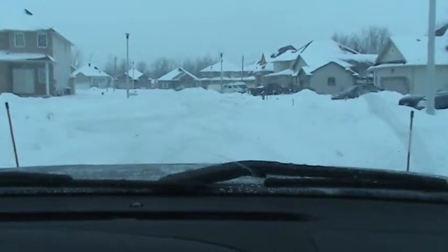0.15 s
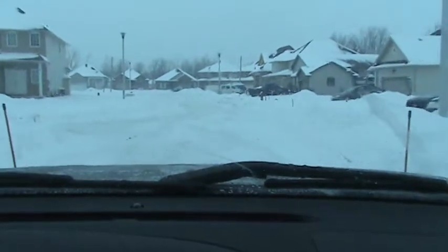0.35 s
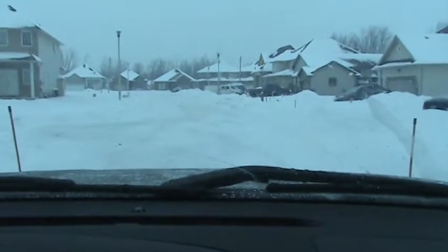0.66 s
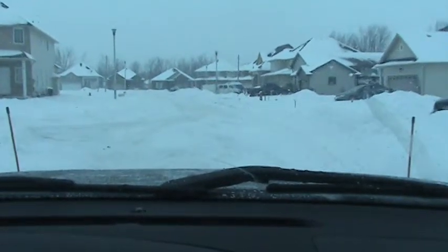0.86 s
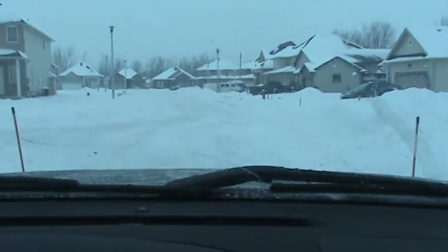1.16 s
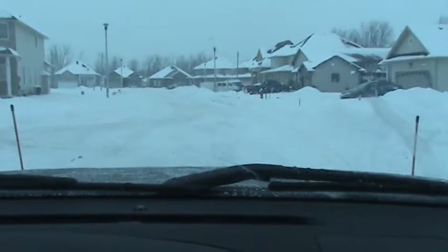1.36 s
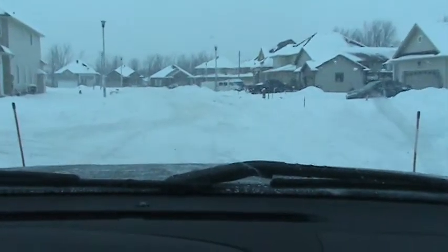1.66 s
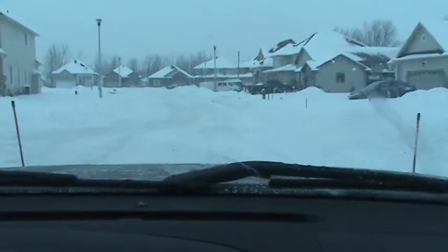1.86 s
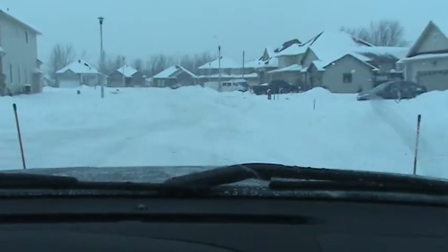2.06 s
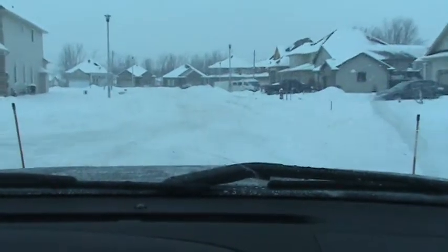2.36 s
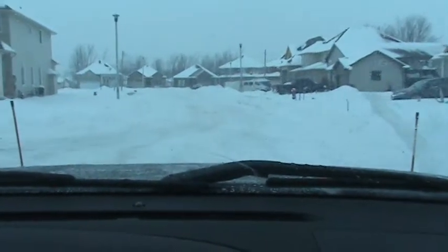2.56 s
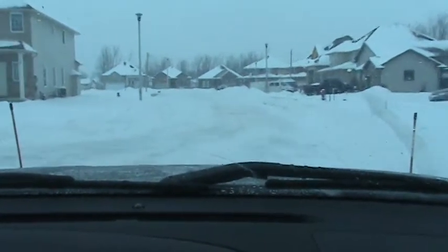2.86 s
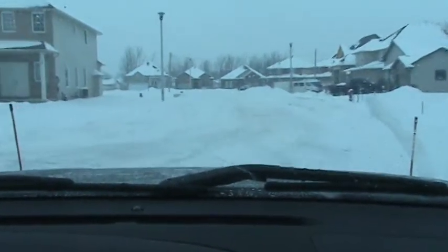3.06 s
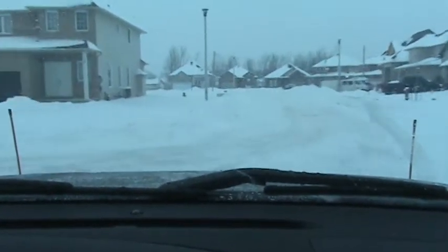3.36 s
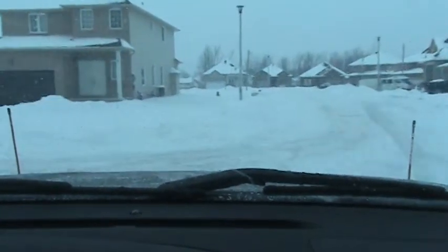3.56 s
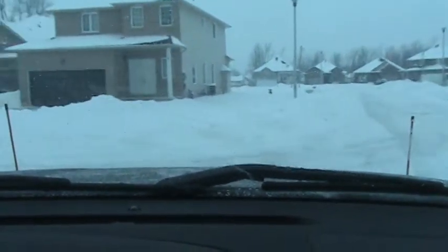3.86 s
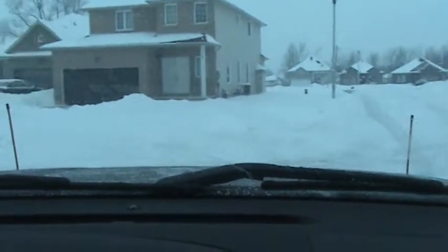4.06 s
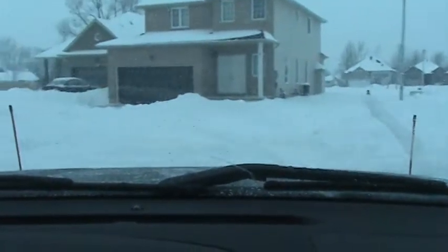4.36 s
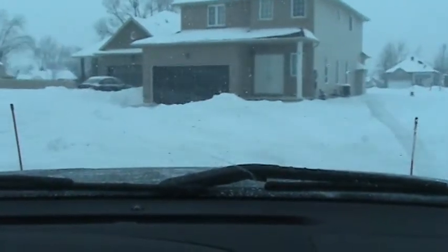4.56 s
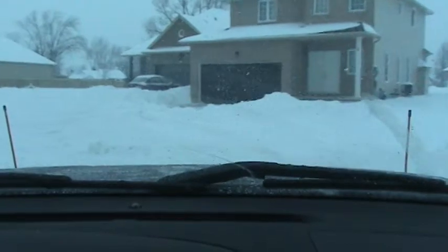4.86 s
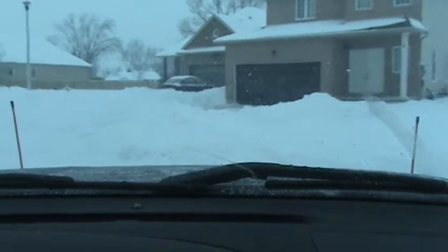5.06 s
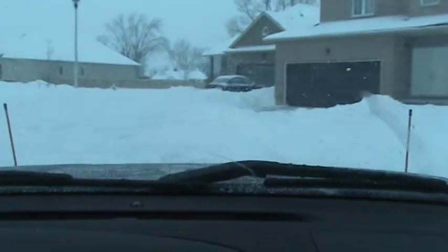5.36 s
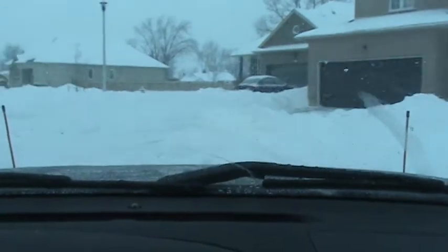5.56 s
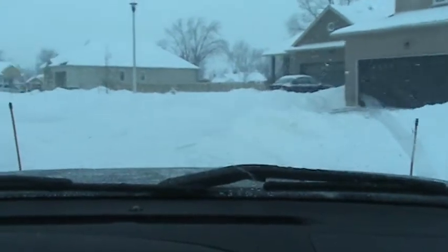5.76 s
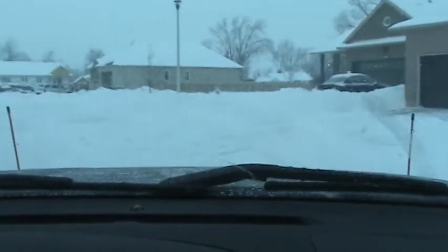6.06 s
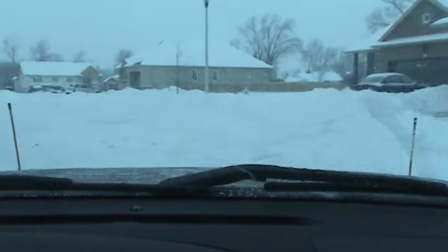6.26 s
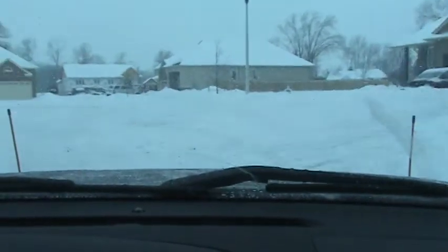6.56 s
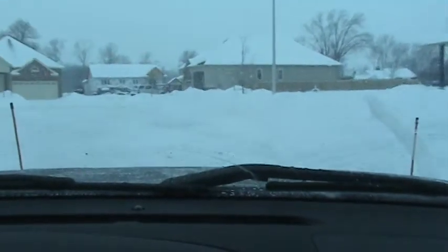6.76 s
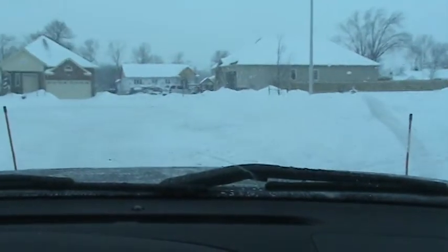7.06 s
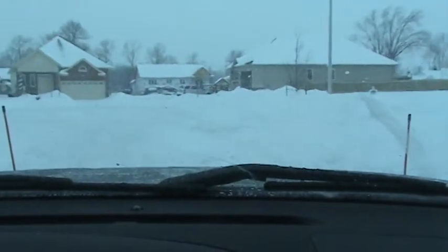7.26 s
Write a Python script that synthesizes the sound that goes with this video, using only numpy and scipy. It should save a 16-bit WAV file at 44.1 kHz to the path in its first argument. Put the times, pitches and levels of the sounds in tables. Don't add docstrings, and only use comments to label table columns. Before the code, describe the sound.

A small stereo camera inside a truck cab hears low body shudder and tyre rumble swelling and easing as the vehicle turns through packed snow. Over it runs a crisp, regular indicator tick-tock. Loose plastic taps and clicks irregularly, busiest in the first second and again after five. Around two to three seconds the cabin booms harder and gloves slip roughly around the wheel rim; afterwards jacket sleeves rustle softly, and dull thuds continue to the end.

```python
import sys
import numpy as np
from scipy import signal
from scipy.fft import rfft, irfft, next_fast_len
from scipy.io import wavfile
from scipy.ndimage import uniform_filter1d, map_coordinates

SR = 44100
rng = np.random.default_rng(int(sys.argv[2]) if len(sys.argv) > 2 else 0)


def makeup_ratio(level_db):
    decades = np.asarray(level_db, float) / 20
    return 10 ** decades


def dump(signal):
    limited = np.clip(np.atleast_2d(signal).T, -1, 1)
    pcm = np.round(limited * 32767).astype(np.int16)
    wavfile.write(sys.argv[1], SR, pcm)


N = 326340


def unit(x):
    return x / np.sqrt(np.mean(np.abs(x) ** 2) + 1e-20)


def along(points, hz):
    f, value = np.transpose(points)
    return np.interp(np.log(hz + 1), np.log(f + 1), value)


def over_time(points):
    s, value = np.transpose(points)
    return np.interp(np.arange(N) / SR, s, value)


def wobble(rate):
    knots = rng.standard_normal(int(N * rate / SR) + 4)
    return map_coordinates(knots, [np.arange(N) * rate / SR])


def filtered(x, response):
    m = next_fast_len(N + SR // 2)
    return irfft(rfft(x, m) * response(np.fft.rfftfreq(m, 1 / SR)), m)[..., :N]


def resonances(modes):
    def response(f):
        total = 0
        for k, (center, width, db) in enumerate(modes):
            damping = 1j * f * width
            total = total + (-1) ** k * makeup_ratio(db) * damping / (center * center - f * f + damping)
        return total
    return response


def rush(spectrum, patchy_db):
    z = signal.stft(rng.standard_normal((2, N)), nperseg=512)[2]
    patches = uniform_filter1d(rng.standard_normal(z.shape[1:]), 6, 0)
    patches = unit(uniform_filter1d(patches, 10, 1))
    pair = signal.istft(z * makeup_ratio(patchy_db * patches), nperseg=512)[1][:, :N]
    return unit(filtered(pair, lambda hz: makeup_ratio(along(spectrum, hz))))


def hum(hz, width, steady):
    drift = wobble(width) + 1j * wobble(width)
    drift = unit(drift / (np.abs(drift) + 0.053) ** np.clip(steady, 0, 1))
    wave = drift * np.exp(2j * np.pi * hz * np.arange(N) / SR) * np.sqrt(2)
    return np.array([wave.real, 0.36 * wave.imag])


def swells(s, db, rise, fall, hold, rest_db, bend):
    s, db, rise, fall, hold = (np.reshape(v, (-1, 1)) for v in (s, db, rise, fall, hold))
    t = np.arange(0, N + 16, 16) / SR
    before = np.maximum(s - t, 0) / np.abs(rise)
    after = np.maximum(t - s - hold, 0) / np.abs(fall)
    peaks = makeup_ratio(db - 10 * (before + after) ** bend)
    gain = np.sqrt((peaks ** 2).sum(axis=0) + makeup_ratio(rest_db) ** 2)
    return np.interp(np.arange(N) / SR, t, gain)


# start t/s, length t/s, level/dB
BODY_ROCKS = [(0.41, 0.54, -19), (1.32, 0.087, -18.5), (1.854, 0.23, -23), (2.43, 0.046, -25),
              (2.7, 0.29, -25), (3.46, 0.61, -28), (4.196, 0.38, -30), (4.81, 0.21, -23),
              (5.155, 0.93, -22.5), (6.34, 0.23, -19), (6.95, 0.23, -30)]
# t/s, level/dB
RUT_KICKS = [(.66, -19.5), (1.52, -21.5), (2.0, -16.5), (2.15, -15), (2.49, -21), (2.68, -16.5),
             (2.779, -11.5), (3.02, -24), (3.23, -32), (3.57, -17), (4.1, -19.5), (4.4, -25), (4.82, -17),
             (5.23, -20), (5.63, -21.5), (5.98, -26), (6.36, -16.5), (6.66, -15.5), (7.16, -25.5)]
# t/s, level/dB
SNOW_LOAD = [(0, -7), (.6, -5.5), (1.1, -6), (1.7, 0), (2.1, 1), (2.8, 3), (3.3, -4), (3.6, 3.5), (4.5, -3),
             (5.2, 2.5), (5.35, -1.5), (6.3, 3.5), (6.8, -3.5), (7.4, -5.5)]


def cab():
    s, length, db = np.transpose(BODY_ROCKS)
    rocking = swells(s, db, rise=0.093, fall=0.11, hold=length, rest_db=-52, bend=0.8)
    shudder = rocking * hum(25.5, width=7, steady=0.4)
    s, db = np.transpose(RUT_KICKS)
    kicks = swells(s, db - 3.5, rise=0.035, fall=0.046, hold=0, rest_db=-62, bend=1.4)
    boom = hum(104.5, width=15, steady=0.36) + makeup_ratio(-1) * hum(114.5, width=16, steady=0.65)
    return shudder + np.hypot(kicks, makeup_ratio(-28 + over_time(SNOW_LOAD))) * boom


# t/s, peak level/dB, middle f/Hz
SUSPENSION_THUDS = [
    (1.961, -23.5, 138),
    (2.683, -32, 159),
    (2.797, -25.5, 248),
    (4.378, -35, 213),
    (5.18, -29, 253),
    (4.941, -33, 262),
    (5.602, -27, 186),
    (5.76, -37, 262),
    (6.149, -34, 269),
    (6.37, -25.5, 140),
]
# f/Hz, level/dB per Hz
FLOOR_RUMBLE = [(4, -22), (14, -38), (38, 0.5), (50, -3), (62, 4.5), (85, -4), (130, -6.5), (150, -6.5),
                (190, -8), (225, -12.5), (262, -7), (310, -13.5), (400, -19), (700, -120)]
# f/Hz, level/dB per Hz
ENGINE_DRONE = [(200, -96), (330, -5.5), (430, 1.5), (650, -1.5), (900, -8.5), (1500, -14), (3000, -21.5),
                (6000, -35), (10000, -65), (13000, -42), (15800, -34)]


def tyres():
    load_db = over_time(SNOW_LOAD)
    rumble_db = -29 + 0.055 * load_db + 0.79 * wobble(6.3)
    sound = makeup_ratio(rumble_db) * rush(FLOOR_RUMBLE, patchy_db=1.18)
    t = np.arange(SR // 5) / SR
    for s, db, hz in SUSPENSION_THUDS:
        tones = sum(np.sin(2 * np.pi * hz * ratio * t) for ratio in (.75, 1, 1.3))
        thud = tones * makeup_ratio(db + 9.5 - 60 * t / 0.091) * (1 - np.exp(-t / 0.0037))
        sound[0, round(s * SR):][:len(t)] += thud
    drone_db = -43 + 0.065 * load_db + 0.54 * wobble(15)
    return sound + makeup_ratio(drone_db) * rush(ENGINE_DRONE, patchy_db=1.5)


# f/Hz, width/Hz, level/dB
DRIVE_WHINE = (11538, 22, -76)


def camera_drive():
    hz, width, db = DRIVE_WHINE
    return makeup_ratio(db) * hum(hz, width, steady=1)[0]


# t/s, peak level/dB, middle f/Hz, panel knock level/dB
PANEL_TAPS = [(0.227, -36, 940, -11), (.2473, -33, 842, 1), (.511, -35, 830, -17), (1.527, -31.5, 805, 1),
              (1.7619, -35, 825, 7.5), (2.1013, -32.5, 970, 6), (3.5034, -56, 860, 3),
              (3.827, -33.5, 1180, 2), (4.9565, -36, 842, -6), (5.1545, -30, 1000, 2),
              (5.3532, -31.5, 1040, -10), (5.391, -31, 960, 6), (5.4188, -34, 961, -11),
              (5.5107, -31.5, 961, 2), (5.6087, -35.5, 950, 8), (5.692, -36, 2500, 6),
              (5.841, -30, 2480, 4), (6.123, -31, 780, -10.5), (6.332, -31, 1480, -14)]
CLIP_TICKS = [(0.042, -27, 2400, -20), (.409, -33.5, 1310, -5), (0.482, -28.5, 1300, 2),
              (0.576, -22.5, 1350, -5), (0.6917, -24, 1290, -16), (.798, -27, 1390, -4),
              (.905, -25.5, 2460, -14), (1.2322, -34.5, 3450, 2), (1.4501, -29, 2400, -12),
              (1.5546, -32, 1430, 5), (2.868, -23, 1200, -8.5), (2.9792, -22.5, 1260, -4),
              (6.369, -32, 2080, 11), (6.3713, -26.5, 1380, 8.5), (6.378, -34.5, 1000, 12),
              (6.573, -39, 2510, -11), (7.0412, -31, 2500, 2), (.559, -29, 2500, 2), (.785, -32, 1500, 0),
              (.827, -34.5, 2500, -9), (1.043, -34.5, 2500, -9), (1.363, -36, 2500, -6),
              (5.134, -38, 1500, 2)]
HOLLOW_TAPS = [(.339, -38, 705, -2), (.46, -42, 740, -9), (.5447, -30.5, 850, -2), (.6596, -30.5, 790, -3),
               (.759, -36.5, 850, -1), (1.027, -41, 910, 4), (1.1105, -28, 824, -5),
               (1.186, -21.5, 1410, -17), (1.415, -36, 750, 0), (1.804, -39, 756, 0),
               (2.588, -33.5, 2500, -9), (3.7302, -27.5, 1030, -5), (3.733, -29, 1430, -5),
               (3.859, -32.5, 640, 3), (3.991, -36, 805, -13), (4.3677, -28.5, 1370, 1),
               (4.381, -28, 1400, 9.5), (5.4674, -30.5, 2430, 3), (5.491, -33, 820, 0),
               (6.524, -46, 774, -7)]
BRIGHT_SNAPS = [
    (2.1696, -18, 3400, -16),
    (2.2425, -28, 1480, -9),
    (2.3213, -26.5, 1380, -9),
    (3.315, -22.5, 1490, -17),
]
# treble level/dB, part ring level/dB, click level/dB, ring width over its pitch
TRIM_KINDS = [
    (-23, 0.5, -1, 0.17),
    (-9.5, -1.5, 0, 0.18),
    (-30, 6, -12, 0.24),
    (-4.5, 1.5, -4, 0.12),
]


def taps():
    t = np.arange(2048) / SR
    f = np.fft.rfftfreq(4096, 1 / SR)
    dull = 1 / (1 + 1j * f / 4300) ** 4
    click = dull * resonances([(2700, 2600, -1.5), (2480, 220, 3)])(f)
    panel = resonances([(620, 700, 0)])(f) ** 2
    fade = (makeup_ratio(-60 * t / 0.016) + 0.6 * makeup_ratio(-60 * t / 0.075)) * (1 - np.exp(-t / 0.00024))
    out = np.zeros((2, N + SR))
    for rows, kind in zip((PANEL_TAPS, CLIP_TICKS, HOLLOW_TAPS, BRIGHT_SNAPS), TRIM_KINDS):
        treble_db, ring_db, click_db, wide = kind
        treble = resonances([(7000, 5000, treble_db - 0.1)])(f) ** 2 / (1 + 1j * f / 9500) ** 3
        for s, db, hz, knock_db in rows:
            crack = rng.standard_normal((2, len(t))) * fade
            crack[0, 6] += 6
            spectrum = rfft(crack, 4096)
            ring = makeup_ratio(2 * ring_db) * resonances([(hz, wide * hz, 0)])(f) ** 2
            tap = irfft(spectrum * (ring + makeup_ratio(click_db) * click - treble))
            knock = irfft(spectrum * panel)
            tap = tap / np.abs(tap[0]).max() + makeup_ratio(knock_db) * knock / np.abs(knock[0]).max()
            out[:, round(s * SR):][:, :4096] += makeup_ratio(db - 1.2) * tap * [[1], [.6]]
    return out[:, :N]


TICK_TIMES = [0.2818, 0.9417, 1.589, 2.2578, 2.921, 3.6073, 4.2303, 4.8995, 5.5502, 6.2138, 6.875]
TOCK_TIMES = [.5941, 1.2512, 1.9119, 2.5931, 3.2332, 3.9011, 4.5714, 5.230, 5.902, 6.541, 7.204]
# f/Hz, level/dB, 60 dB fade t/s, build-up t/s
TICK_MODES = [(1141, -42, .06, .005), (1216, -40, .06, .005), (1335, -39, .06, .005),
              (1426, -33, .065, .007), (1480, -39, .05, .009), (1545, -34, .05, .008),
              (1857, -42, .06, .009), (2304, -35, .07, .009), (2621, -39, .07, .008),
              (3080, -47, .07, .009), (3364, -41, .05, .01), (3472, -34, .05, .01), (3730, -39, .06, .01),
              (4500, -43, .05, .005), (4608, -41, .045, .005), (4656, -30, .065, .006),
              (4740, -40, .06, .005), (5087, -45, .06, .006), (5400, -47, .05, .006)]
# f/Hz, level/dB, 60 dB fade t/s, build-up t/s
TOCK_MODES = [(1130, -43, .04, .004), (1308, -37, .045, .016), (1437, -32, .05, .02),
              (3150, -48, .06, .008), (3364, -39, .04, .008), (3485, -29, .045, .011),
              (3719, -32, .055, .012), (3989, -38, .055, .008), (4500, -43, .05, .007),
              (4657, -34, .07, .007), (4740, -43, .06, .007), (5081, -43, .05, .005),
              (5377, -45, .06, .005), (6965, -49, .06, .007), (7200, -49, .05, .008),
              (7660, -52, .04, .007), (8031, -51, .04, .008), (8489, -49, .05, .005),
              (8607, -47, .06, .008), (8774, -48, .05, .008), (9388, -52, .04, .007)]
# f/Hz, level/dB per Hz
TICK_BUZZ = [(800, -52), (1200, 10), (1600, 4), (2000, -10), (3000, -8.5), (4000, 1.5), (5300, -0.5),
             (6500, -10.5), (9500, -12.5), (11000, -26)]
# f/Hz, level/dB per Hz
TOCK_BUZZ = [(900, -52), (1300, 10), (1700, -10), (2900, -17), (3400, 1), (4300, -2.5), (5400, -9.5),
             (6300, -15), (7000, -6), (9000, -9), (11000, -29)]


def relay(strokes, level_db, modes, buzz_spectrum):
    t = np.arange(SR // 6) / SR
    hz, db, t60, build = np.transpose(modes)[:, :, None]
    swell = np.minimum(t / build, 1) ** 1.25 * makeup_ratio(db - 60 * np.maximum(t - build, 0) / t60)
    phase = [[[.1]], [[1]]] * rng.random((2, len(modes), 1))
    rings = swell * np.sin(2 * np.pi * (hz * (t - build) + phase))
    buzz_shape = makeup_ratio(level_db - 30 - 60 * t / 0.1) * np.minimum(t / 0.0081, 1)
    out, buzz = np.zeros((2, N + SR)), np.zeros(N + SR)
    for s in strokes:
        start = round((s - .003) * SR)
        own_db = rng.normal(0, 0.96, len(modes))
        out[:, start:][:, :len(t)] += makeup_ratio(level_db + own_db) @ rings * [[1], [.5]]
        buzz[start:][:len(t)] += buzz_shape
    return out[:, :N] + buzz[:N] * rush(buzz_spectrum, patchy_db=-0.5)


# start t/s, hold t/s, level/dB, rise t/s, fall t/s (both for 10 dB)
GLOVE_SLIPS = [
    (2.245, 0.089, -37.5, 0.0043, 0.015),
    (2.444, 0.0053, -35.5, 0.0066, 0.12),
    (2.625, 0.027, -35.5, 0.048, 0.3),
    (2.893, 0.0066, -35, 0.088, 0.18),
    (2.997, 0.057, -32, 0.029, 0.12),
    (3.115, 0.056, -35, 0.08, 0.1152),
    (3.22, 0.059, -38.5, 0.038, 0.18),
]
# t/s, level/dB over the slipping
GLOVE_CATCHES = [(2.284, 2), (2.312, 5), (2.442, 5), (2.453, 6), (2.466, 8), (2.49, -8), (2.518, 11.5),
                 (2.535, 9), (2.628, 5), (2.665, 10), (2.685, 8), (2.712, 10), (2.74, -3), (2.773, 3),
                 (2.802, 5), (2.827, 6), (2.85, 6), (2.888, 7), (2.909, 9), (2.96, 6), (3.025, 6),
                 (3.084, -4), (3.115, 1), (3.266, 9), (3.29, 2)]
# t/s, share 0-1
SPOKE_SHARE = [(2.2, 1), (2.56, 0.93), (2.7, .7), (2.78, 0.07), (3.08, 0.06), (3.15, 0.5), (3.25, 0.24),
               (3.4, 0.4)]
# f/Hz, width/Hz, level/dB
SPOKE_MODES = [(720, 270, -3), (1080, 290, -3), (1440, 157, 2.5), (1710, 330, -6), (2600, 890, -10),
               (3400, 240, -14), (5000, 3400, -20.5)]
# f/Hz, width/Hz, level/dB
OPEN_MODES = [(707, 330, -4.5), (1065, 120, 0.5), (1205, 81, 2.5), (1750, 340, -5.5), (2600, 480, -5),
              (3840, 1100, -10.5), (5500, 2200, -16.5)]
# peak t/s, sheen level/dB, body above sheen level/dB, rise t/s, fall t/s (for 10 dB)
SLEEVE_SWEEPS = [(.59, -60, 11, .1, -0.56), (.75, -57, 12, 0.041, 0.13), (.95, -63, 10.5, 0.16, 1.5),
                 (2.64, -57.5, 12, 0.036, 0.6), (3.1, -57, 15.5, 0.48, 0.26), (3.8, -63.5, 11.5, 0.32, 1.5),
                 (4.141, -48.5, 12, 0.037, 0.05), (4.381, -46.5, 11, 0.17, 0.01),
                 (4.491, -53, 15.5, 0.26, -0.02), (5.23, -54.5, 12, .25, 0.17),
                 (6.18, -53.5, 10.5, 0.18, -0.03), (6.3, -58.5, 11, 0.3, 0.05), (6.7, -53, 8.5, 0.13, .5),
                 (7.0, -51, 8, 0.36, 0.18), (7.3, -57, 10.5, 0.16, 3)]
# f/Hz, level/dB per Hz
CLOTH_BODY = [(700, -60), (1500, -8), (2300, -5), (3500, -1.5), (5000, 0.5), (7500, 0), (9500, -3.5),
              (11500, -15.5), (15800, -40)]
# f/Hz, level/dB per Hz
CLOTH_SHEEN = [(5000, -44), (8000, -11.5), (10000, 3), (12500, 1.5), (15800, -10)]


def rung(x, modes):
    return filtered(x, lambda hz: resonances(modes)(hz) / (1 + 1j * hz / 9000) ** 3)


def hands():
    s, hold, db, rise, fall = np.transpose(GLOVE_SLIPS)
    grip = swells(s, db, rise, fall, hold, rest_db=-63, bend=1.25)
    s, db = np.transpose(GLOVE_CATCHES)
    catches = swells(s, db, rise=0.00086, fall=0.0045, hold=0, rest_db=0.5, bend=0.53)
    flutter = makeup_ratio(0.88 * wobble(160) + 1.56 * wobble(35.05))
    slips = catches * flutter * rng.standard_normal((2, 2, N))
    share = np.clip(over_time(SPOKE_SHARE), 0, 1)
    rim = rung(np.sqrt(share) * slips[0], SPOKE_MODES)
    rim = rim + rung(np.sqrt(1 - share) * slips[1], OPEN_MODES)

    s, db, body_db, rise, fall = np.transpose(SLEEVE_SWEEPS)
    sheen = swells(s, db, rise, fall, hold=0, rest_db=-67.5, bend=1.6)
    body = swells(s, db + body_db, rise, fall, hold=0, rest_db=-59, bend=1.42)
    cloth = np.hypot(body, makeup_ratio(-9.5) * grip) * rush(CLOTH_BODY, patchy_db=1.73)
    cloth = cloth + np.hypot(sheen, makeup_ratio(-35) * grip) * rush(CLOTH_SHEEN, patchy_db=0.5)
    return grip * unit(rim) + makeup_ratio(0.84 * wobble(60)) * cloth


# t/s, length t/s, level/dB, middle f/Hz
JACKET_FOLDS = [(0.819, 0.016, -50, 2600), (1.326, 0.024, -48, 4440), (1.369, 0.023, -49.5, 4500),
                (1.769, 0.047, -48, 3070), (3.836, 0.02, -46.5, 3160), (4.045, 0.023, -51.5, 3440),
                (4.721, 0.014, -55, 2500), (4.757, 0.055, -51, 3900), (4.963, .02, -49, 2600),
                (5.624, 0.011, -49.5, 2300), (6.242, 0.013, -45, 2400), (6.612, 0.01, -44, 2380),
                (7.359, 0.024, -46, 2980)]


def folds():
    out = np.zeros((2, N + SR))
    t = np.arange(4096) / SR
    f = np.fft.rfftfreq(len(t), 1 / SR)
    for s, length, db, hz in JACKET_FOLDS:
        pace = 130 / SR * makeup_ratio(2.3 * rng.standard_normal(len(t)))
        beat = np.cumsum(pace) % 1
        snaps = rng.standard_normal((2, len(t))) * makeup_ratio(-22 * beat) * (t < length)
        run = irfft(rfft(snaps) * resonances([(hz, .9 * hz, 0)])(f) ** 2)
        out[:, round(s * SR):][:, :len(t)] += makeup_ratio(db) * unit(run) * np.sqrt(length / t[-1])
    return out[:, :N]


# f/Hz, likeness 0-1
LIKENESS = [(25, .98), (60, .74), (110, .85), (180, .5), (270, .79), (550, .72), (1400, .78), (4000, .74),
            (8000, .7), (15000, .76)]


def scene():
    both = cab() + tyres() + taps()
    both = both + relay(TICK_TIMES, 2, TICK_MODES, TICK_BUZZ)
    both = both + relay(TOCK_TIMES, 1.2, TOCK_MODES, TOCK_BUZZ)
    both = both + hands() + folds()

    def spread(hz):
        angle = np.arccos(np.clip(along(LIKENESS, hz), -1, 1)) / 2
        return np.array([np.ones_like(hz), np.tan(angle)])

    mid, side = filtered(both, spread)
    return np.array([mid + side, mid - side])


# f/Hz, level/dB
LEFT_OVER_RIGHT = [(25, -2), (60, -5), (110, -8), (180, -4), (270, -5), (500, -1), (800, .5), (1200, 2),
                   (2400, 3.3), (5000, 3.9), (9000, 3.4), (15000, 1.2)]
# f/Hz, phase/radians
LEFT_LEAD = [(25, -.87), (60, -1.1), (110, -.62), (180, -1.3), (270, -.76), (550, -.56), (1200, -.34),
             (4000, -.2), (8000, 0)]


def capsules(dry):
    def response(hz):
        half = makeup_ratio(along(LEFT_OVER_RIGHT, hz) / 2) * np.exp(.5j * along(LEFT_LEAD, hz))
        return np.array([half, 1 / half]) * (hz > 3) * (hz < 15830)
    return filtered(dry, response)


def top_cut(x):
    return signal.sosfilt(signal.butter(12, 15820, fs=SR, output="sos"), x)


def record(dry):
    return top_cut(capsules(dry) + camera_drive())


dry = scene()
out = record(dry)
dump(out)
```